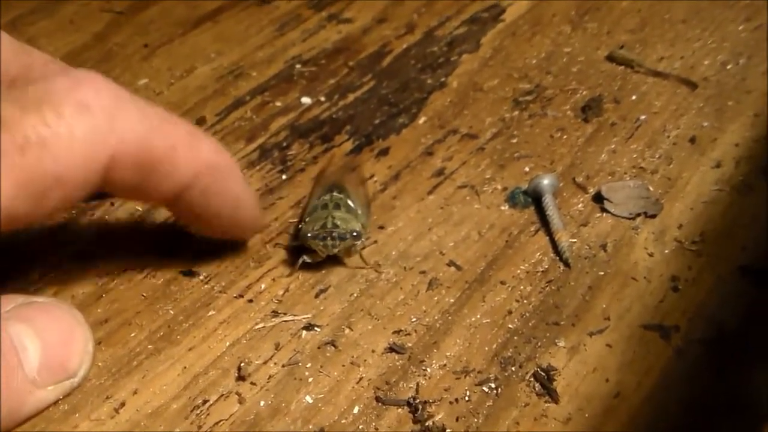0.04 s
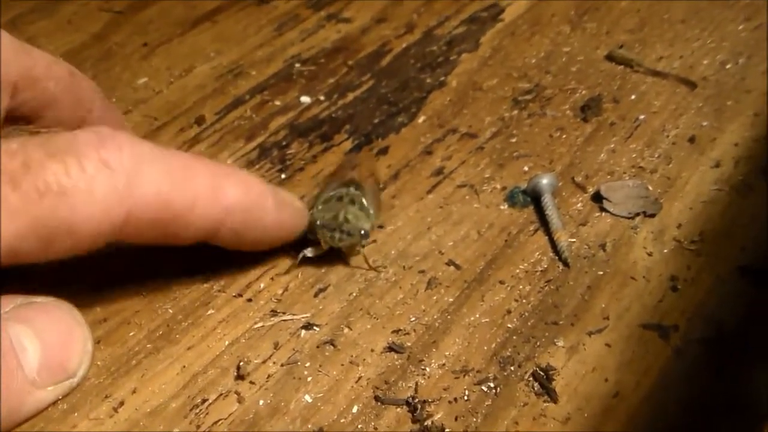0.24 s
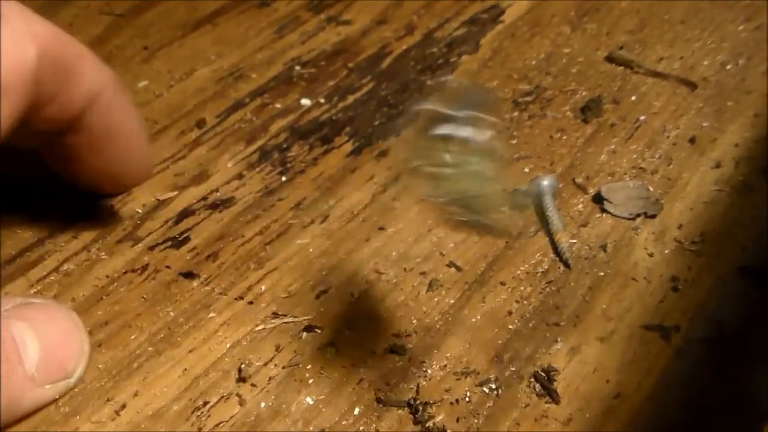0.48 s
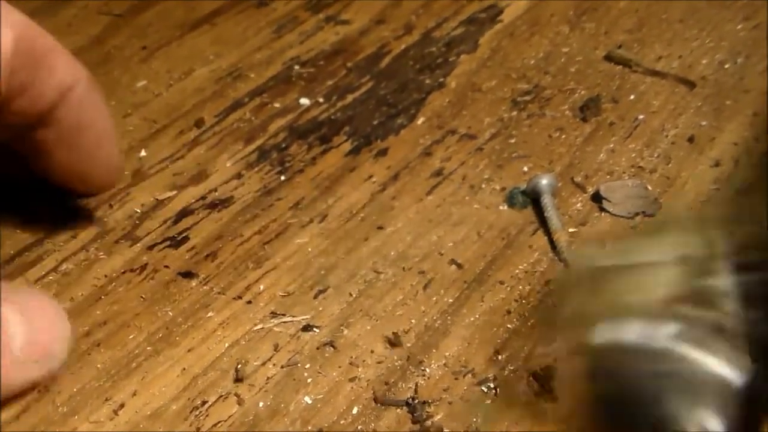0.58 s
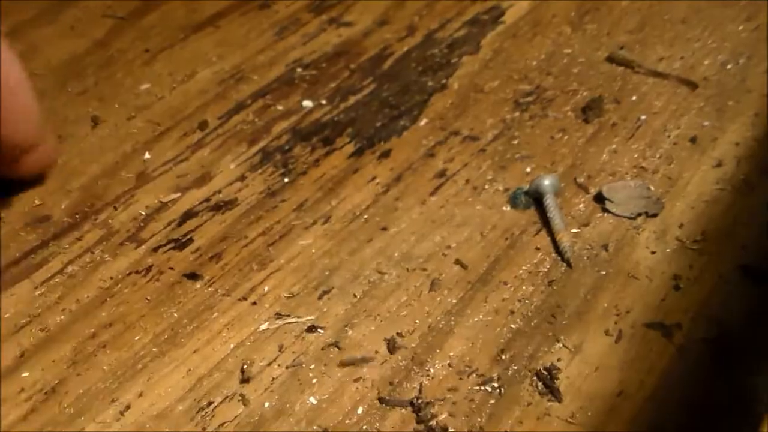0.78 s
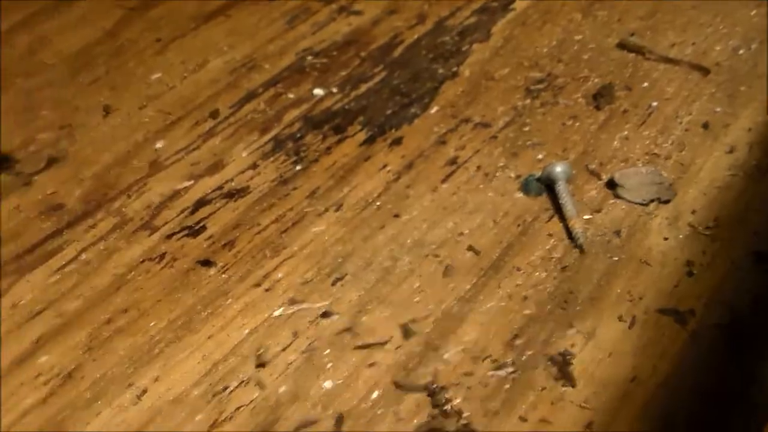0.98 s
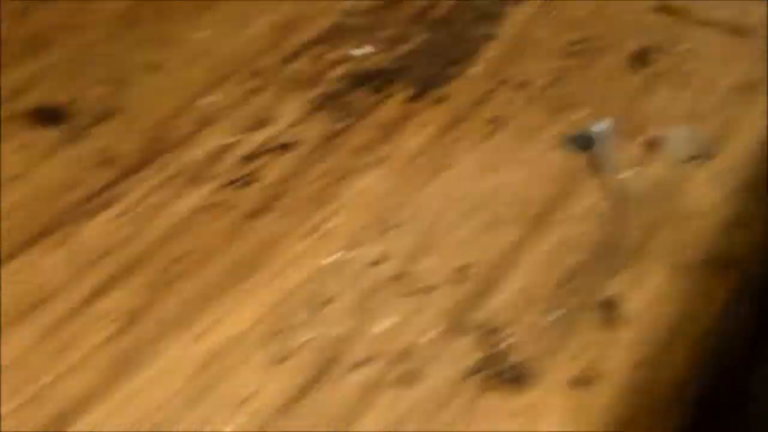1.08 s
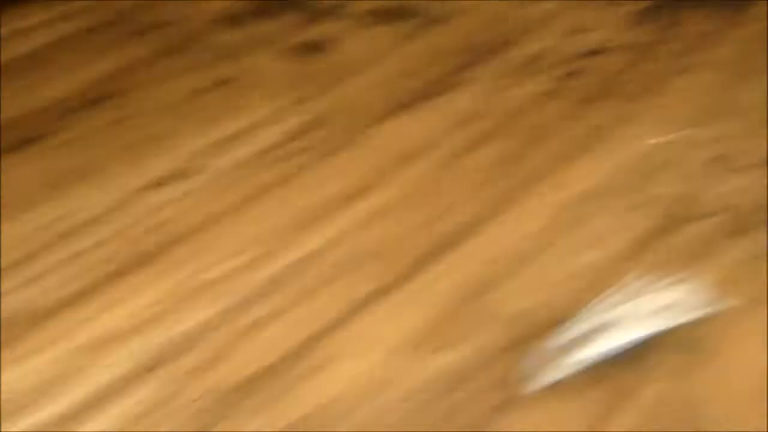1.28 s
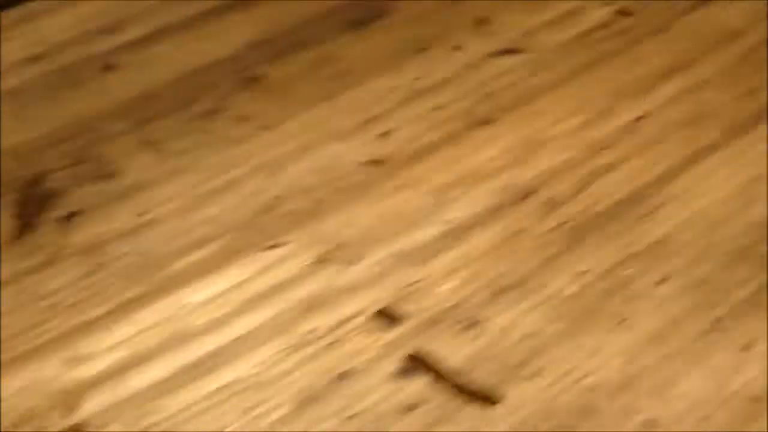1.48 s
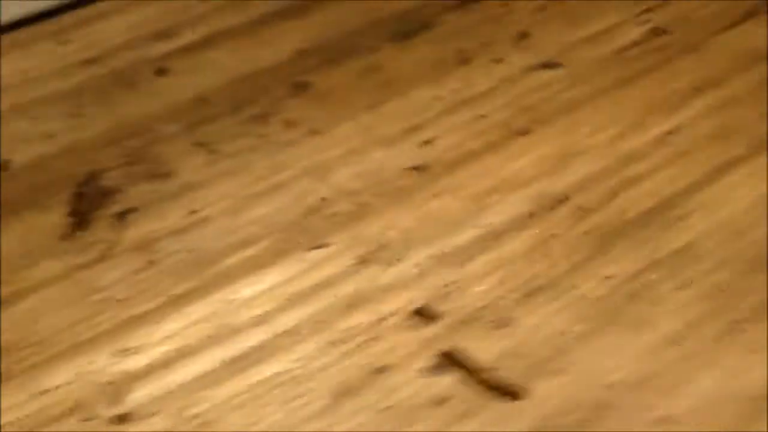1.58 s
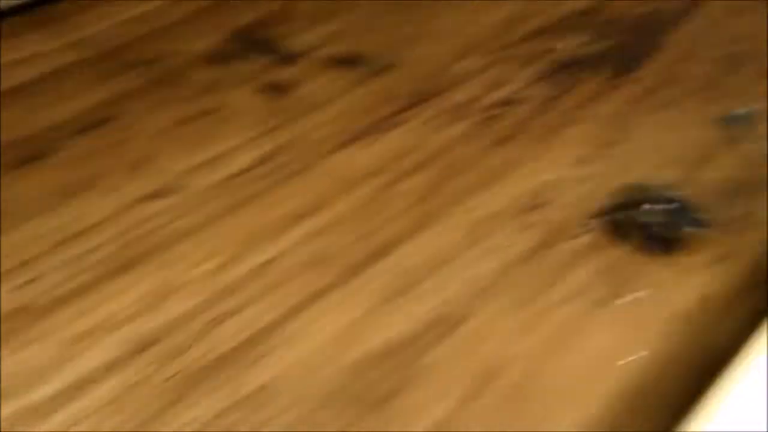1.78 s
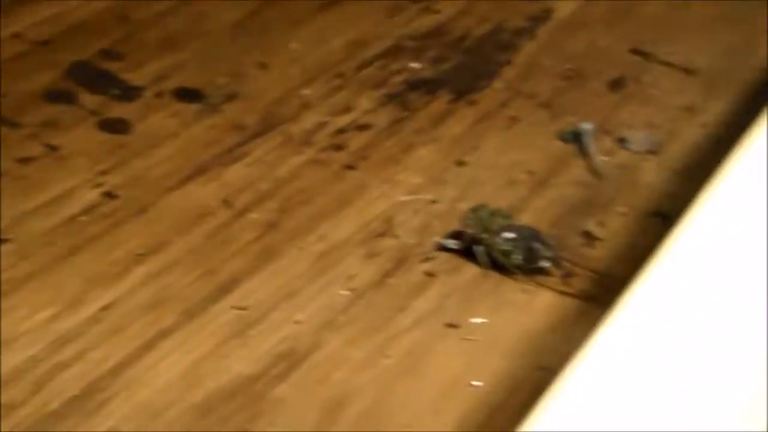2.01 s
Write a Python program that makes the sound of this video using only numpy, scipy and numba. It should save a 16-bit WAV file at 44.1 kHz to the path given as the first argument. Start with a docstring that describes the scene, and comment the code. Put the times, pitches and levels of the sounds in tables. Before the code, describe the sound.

Loud, stuttering cicada buzz with fluttering wings and small knocks on wood.

```python
"""Cicada on a wooden table

A poked cicada squawks, flies off and flutters about, buzzing in short bursts. Its two tymbals
(ribbed sound plates) buckle in turn, each a quick run of snaps that rings its hollow body.
It bumps and scuffs on the wood in a small dry room. Automatic gain control pushes the
room's low rumble down while the insect sounds."""
import sys
import numpy as np
from scipy import signal
from scipy.fft import rfft, irfft
from scipy.io import wavfile
from scipy.ndimage import minimum_filter1d
from numba import njit

SR = 44100
rng = np.random.default_rng(int(sys.argv[2]) if len(sys.argv) > 2 else 0)


def store_wav(level_fs):
    """Save 16-bit WAV to argv[1]."""
    pcm = np.round(np.clip(np.atleast_2d(level_fs), -1, 1) * 32767)
    wavfile.write(sys.argv[1], SR, pcm.T.astype(np.int16))


N = 90404

# The tone of the room noise. Each row: frequency in Hz, relative level in dB.
RUMBLE_SPECTRUM = [(15, -33), (25, 1.5), (64, 0), (118, -8), (354, -17.5), (488, -16.5), (749, -18.5),
                   (1000, -23.5), (1120, -27.5), (13500, -50), (15000, -60)]
# Swells of low hum. Each row: start and end in seconds, pitch in Hz, level in dB.
HUMS = [(0.017, 0.23, 68, -32), (0.27, 0.3, 43, -39), (1.13, 1.25, 50, -31.5), (1.87, 1.94, 91, -32),
        (2, 2.31, 460, -59)]
# Spells of wing beating. Each row: start and end in seconds, air puffs in dB, rustle in dB.
FLIGHTS = [(0.524, 0.937, -42, -40.5), (0.665, 0.797, -38, -59), (1.086, 1.42, -45, -46.5),
           (1.51, 1.794, -61, -45.5)]
# Bumps on the table. Each row: time in seconds, wood knock in dB, wing crackle in dB.
BUMPS = [(0.332, -72, -45), (0.645, -20, -9.5), (.926, -18, -14), (.950, -19.5, -10.5), (0.98, -21, -43),
         (1.062, -26, -11), (1.075, -31, -24), (1.347, -27.5, -18.5), (1.617, -37, -17.5),
         (1.641, -29, -34), (1.661, -41, -13.5), (1.726, -46, -15), (1.741, -48, -22), (1.8678, -30, -22.5),
         (1.8753, -43, -25), (1.9197, -40, -28.5)]
# How the table top rings. Each row: pitch in Hz, seconds to fade by 60 dB, relative level in dB.
WOOD_MODES = [(329, 0.028, -10.5), (520, 0.015, -1), (730, 0.024, -12), (1027, 0.0083, -7),
              (1240, 0.03, -11), (1730, 0.009, -8.5), (2300, 0.01, -4.5)]
# Lone tymbal snaps. Each row: time in seconds, level in dB.
SNAPS = [(.3801, -3), (.3827, -4.5), (1.0753, -1), (1.875, -19)]
# Bursts of buzzing. Each row: start and end in seconds, the pulse rate it settles to in Hz,
# relative levels of the rebound click and the rasp in dB.
BURSTS = [(0.3862, 0.461, 206.6, 2, 1), (0.513, 0.5224, 194, 5, -2.5), (0.539, 0.858, 225.4, -39, -23.5),
          (0.866, 0.925, 222.1, -5.5, -15), (1.02, 1.029, 191, -7, -11.5), (1.0747, 1.242, 223.8, -8, -7.5),
          (1.251, 1.279, 232, -11, -16), (1.2943, 1.424, 220.2, -5.5, -7),
          (1.4458, 1.513, 218.2, -12, -17.5), (1.540, 1.608, 229.4, -4, -12),
          (1.6255, 1.694, 222.1, -2.5, -12), (1.712, 1.752, 192.6, -1, -11)]
# Pulse strength. Each row: time in seconds, then relative low, middle and treble levels in dB.
EFFORT = [(.385, -17.5, -30.5, -41.5), (.455, -25.5, -32, -43), (.518, -26.5, -34, -47),
          (.545, -23.5, -25.5, -39), (.567, -34, -29, -34), (.595, -40, -18.5, -32),
          (.632, -16, -15.5, -27.5), (.668, -21, -20, -25), (.725, -16.5, -11.5, -26.5),
          (.76, -20.5, -21, -23), (.795, -16.5, -18, -21), (.825, -77, -20.5, -33.5), (.85, -18, -19, -30),
          (.875, -22.5, -19, -29.5), (.903, -24, -24, -27), (.925, -70, -24, -28), (1.024, -33.5, -37, -31),
          (1.08, -25.5, -24.5, -29), (1.117, -34.5, -28, -36.5), (1.15, -25.5, -30, -31),
          (1.185, -34, -30, -37.5), (1.225, -37.5, -31, -34.5), (1.265, -24, -27, -29.5),
          (1.32, -49, -21, -35), (1.348, -27.5, -32, -30.5), (1.39, -30.5, -27, -41), (1.42, -35, -33, -34),
          (1.452, -26.5, -25, -34.5), (1.495, -27.5, -23, -28.5), (1.548, -28, -27, -33),
          (1.598, -34.5, -26.5, -30), (1.632, -38, -21, -35.5), (1.688, -34, -33.5, -33.5),
          (1.722, -26.5, -31, -35.5), (1.748, -30.5, -26, -31)]
# How tymbal and body ring, in three bands. Each row: pitch in Hz, ring time in ms, relative level in dB.
LOW_MODES = [(3780, 0.47, -17), (3880, 0.44, -3.5)]
MID_MODES = [(5018, 0.332, 0.0043)]
TREBLE_MODES = [(6575, 0.2154, 2.5), (8830, 0.2165, -2), (14600, 0.11, -8.5)]
# Body tension tunes that ringing. Each row: time in seconds, factor on the pitch.
TENSION = [(.39, .93), (.53, 0.93), (.58, .9), (.63, 1.034), (.67, 0.95), (.70, 1.01), (.735, 1.03),
           (.8, 1.007), (.9, 1.034), (1.08, 0.95), (1.16, 1.04), (1.32, 1.075), (1.38, 0.95), (1.49, 0.99),
           (1.6, 1.055), (1.68, 1.01), (1.74, .98)]
# Stutters, where the second tymbal goes weak. Each row: start and end in seconds.
STUTTERS = [(.825, 0.87), (1.18, 1.16), (1.345, 1.415)]
# Where the insect is. Each row: time in seconds, head start of the left ear in microseconds.
LEFT_LEAD = [(.55, -3), (.71, -26.5), (.79, 30.5), (.88, 37.5), (1.3, 38), (1.48, -40.5), (1.65, -39),
             (1.75, -25)]

WINGBEAT_HZ, PUFF_HZ = 45, 204
CRACKLE_MS, CRACKLE_BAND_HZ = 6.4, (2700, 8000)
RIB_COUNT, RIB_GAP_MS, RIB_FALL_DB = 3, .36, -10
MODE_DETUNE, TYMBAL_DETUNE = .022, .018  # shares of the pitch
RATE_KICK_HZ, KICK_S = 14, .04  # each burst starts fast and settles
REBOUND_SHARE, JITTER_MS = .4, .076
BUZZ_DB, STUTTER_DB, STRAY_DB = 19.5, -13, -13
RASP_MS, RASP_TOP_HZ, BUZZ_LOW_HZ = 1, 6940, 2890
ROOM_FADE_S, EARLY_DB, TAIL_DB = .15, -8.5, -7.5
THRESHOLD_DB, RATIO, ATTACK_S, RELEASE_S = -23.5, 2.184, .0005, .16  # gain control
OPPOSITE_EARS = np.array([[1], [-1]])


def undb(db):
    """Turns decibels into a gain."""
    return 10 ** (np.asarray(db) / 20)


def curve(table, t):
    """Reads a table's values at time t, gliding between rows."""
    table = np.array(table, float)
    return [np.interp(t, table[:, 0], column) for column in table[:, 1:].T]


def cut(x, hz, kind, order=2):
    """Keeps the "low" or the "high" side of hz."""
    return signal.sosfilt(signal.butter(order, hz, kind, fs=SR, output="sos"), x)


def add(out, start, x):
    """Mixes x in at start seconds."""
    i = int(start * SR)
    out[:, i:i + x.shape[-1]] += x[..., :max(N - i, 0)]


def swell(t, start, end):
    """A rounded rise and fall in level."""
    return np.sqrt(np.abs(np.sin(np.pi * np.clip((t - start) / (end - start), 0, 1))))


def ring(t, hz, ms):
    """A tone that peaks after ms milliseconds and dies away."""
    age = np.maximum(t, 0) * 1000 / ms
    return age * np.exp(1 - age) * np.sin(2 * np.pi * hz * (t - ms / 1000))


@njit
def follow(x, attack, release):
    """Tracks a level, quick up and slow down."""
    out, level = np.empty(len(x)), 0.
    for i in range(len(x)):
        level += (x[i] - level) * (attack if x[i] > level else release)
        out[i] = level
    return out


def rumble():
    """Low room noise, alike in both ears in the bass, with swells of hum."""
    freqs, t = np.maximum(np.fft.rfftfreq(N, 1 / SR), 1), np.arange(N) / SR
    hz, db = np.array(RUMBLE_SPECTRUM).T
    mid, side = rfft(rng.standard_normal((2, N))) * undb(np.interp(np.log(freqs), np.log(hz), db))
    width = np.minimum(.13 + freqs / 9000, 1)
    noise = irfft(mid + side * width * OPPOSITE_EARS, N)
    out = noise / noise.std() * undb(-41)
    for start, end, hum_hz, hum_db in HUMS:
        out += undb(hum_db) * swell(t, start, end) * np.sin(2 * np.pi * (hum_hz * t + rng.random()))
    return out


def room(x):
    """Adds quick echoes off the table and things nearby, then the room's short tail."""
    t = np.arange(SR // 3) / SR
    early, tail = rng.standard_normal((2, 2, len(t)))
    early = (early + .33 * early[::-1]) * np.exp(-t / .0058) * (t > .0006)
    tail = (tail + .41 * tail[::-1]) * undb(-60 * t / ROOM_FADE_S) * (1 - np.exp(-t / .0027))
    echo = sum(undb(db) * part / np.sqrt(np.sum(part ** 2) / 2)
               for part, db in ((early, EARLY_DB), (tail, TAIL_DB)))
    return x + signal.fftconvolve(x, echo, axes=1)[:, :N]


def wings():
    """Each wingbeat pushes a soft puff of air and rustles the dry wings."""
    t = np.arange(N) / SR
    beat = np.exp(-(t * WINGBEAT_HZ % 1) / .85)
    puff = cut(cut(beat * rng.standard_normal(N), PUFF_HZ, "low"), 38, "high")
    rustle = cut(cut(beat * rng.standard_normal(N), 1501, "high", order=1), 2500, "low")
    out = np.zeros(N)
    for start, end, puff_db, rustle_db in FLIGHTS:
        flutter = undb(puff_db) * puff / puff.std() + undb(rustle_db) * rustle / rustle.std()
        out += swell(t, start, end) * flutter
    return out


def bumps():
    """The body knocks the table top and the dry wings crackle against it."""
    knock, crackle = np.zeros((2, 2, N))
    t = np.arange(SR // 12) / SR
    for start, knock_db, crackle_db in BUMPS:
        wood = 0
        for hz, fade_s, db in WOOD_MODES:
            pitch = hz * (1 + .046 * rng.standard_normal())
            wood += undb(db - 60 * t / fade_s) * np.sin(2 * np.pi * pitch * t) * rng.standard_normal()
        add(knock, start, undb(knock_db) * wood)
        mid, side = rng.standard_normal((2, len(t))) * undb(2.17 * rng.standard_normal(len(t)))
        grains = mid + .52 * side * OPPOSITE_EARS
        add(crackle, start, undb(crackle_db) * grains * np.exp(-t * 1000 / CRACKLE_MS))
    low_hz, top_hz = CRACKLE_BAND_HZ
    return knock + cut(cut(crackle, top_hz, "low", order=1), low_hz, "high", order=1)


def snaps():
    """Lone hard tymbal snaps, sharper than the clicks of the buzz."""
    out, t = np.zeros((2, N)), np.arange(SR // 125) / SR
    snap = ring(t, 3900, ms=.22) + .2 * ring(t, 3840, ms=.09) + .24 * ring(t, 6000, ms=.045)
    for start, db in SNAPS:
        add(out, start, undb(db) * snap)
    return out


def buckle(start, bands_db, tuning, rasp_db):
    """One tymbal buckles: its ribs snap one after another and ring the body, with a short rasp."""
    t = (np.arange(SR // 125) - start * SR % 1) / SR  # a click can start between samples
    ear_t = t + curve(LEFT_LEAD, start)[0] * OPPOSITE_EARS / 2e6
    rib_times = np.arange(RIB_COUNT) * RIB_GAP_MS / 1000 * (1 + .24 * rng.standard_normal(RIB_COUNT))
    stretches = (1 + .95 * (tuning - 1), tuning, tuning)  # the low band bends a little less
    tone = 0
    for db, modes, stretch in zip(bands_db, (LOW_MODES, MID_MODES, TREBLE_MODES), stretches):
        for hz, ms, mode_db in modes:
            pitch = hz * (stretch + MODE_DETUNE * rng.standard_normal())
            # the fluttering body beams each click unevenly to the two ears
            ear_gains = undb(2.5 * rng.standard_normal((2, 1)))
            tone += ear_gains * sum(undb(db + mode_db + k * RIB_FALL_DB) * ring(ear_t - delay, pitch, ms)
                                    for k, delay in enumerate(rib_times))
    rasp = rng.standard_normal((2, len(t))) * np.exp(-t * 1000 / RASP_MS)
    return tone, rasp * undb(bands_db[2] + rasp_db + 12)


def buzz():
    """The two tymbals buckle in turn and click again as they spring back; a loose rib clicks at random."""
    tone, rasp = np.zeros((2, 2, N))
    for start, end, rate_hz, rebound_db, rasp_db in BURSTS:
        now, tymbal = start, 0
        while now < end:
            period = 1 / (rate_hz + RATE_KICK_HZ * np.exp((start - now) / KICK_S))
            stuttering = any(begin < now < stop for begin, stop in STUTTERS)
            bands_db = np.array(curve(EFFORT, now)) + tymbal * STUTTER_DB * stuttering
            tuning = curve(TENSION, now)[0] + (tymbal - .5) * TYMBAL_DETUNE
            clicks = ((0, 0), (REBOUND_SHARE * period, rebound_db), (rng.random() * period, STRAY_DB))
            for delay, db in clicks:
                at = now + delay + JITTER_MS / 1000 * rng.standard_normal(2)[0]
                click_tone, click_rasp = buckle(at, bands_db + db, tuning, rasp_db)
                add(tone, at, click_tone)
                add(rasp, at, click_rasp)
            now, tymbal = now + period, 1 - tymbal
    return undb(BUZZ_DB) * cut(tone + cut(rasp, RASP_TOP_HZ, "low"), BUZZ_LOW_HZ, "high", order=6)


def scene():
    """Insect and table in the room, over the rumble."""
    return room(buzz() + snaps() + bumps() + wings()) + rumble()


def record(dry):
    """Gain control turns loud moments down, then peaks are rounded and the top treble is cut."""
    hold, ceiling = int(.006 * SR), .45
    peaks = -minimum_filter1d(-np.abs(dry).max(axis=0), hold, origin=(hold - 1) // 2)
    level = follow(peaks, 1 / (ATTACK_S * SR), 1 / (RELEASE_S * SR))
    evened = dry * np.maximum(level / undb(THRESHOLD_DB), 1) ** (1 / RATIO - 1)
    rounded = evened / (1 + (evened / ceiling) ** 6) ** (1 / 6)
    steep_cut = signal.ellip(8, .2, 70, 16300, fs=SR, output="sos")
    return signal.sosfilt(steep_cut, cut(rounded, 14060, "low", order=14))


dry = scene()
out = record(dry)
store_wav(out)
```